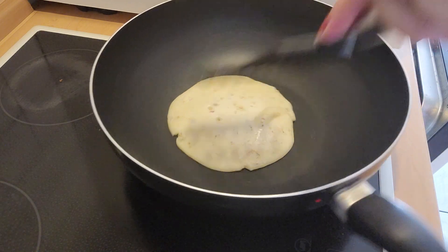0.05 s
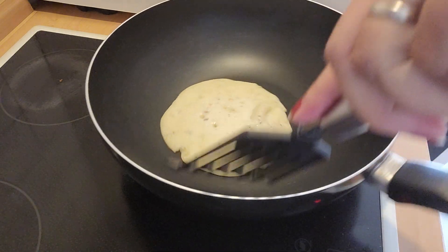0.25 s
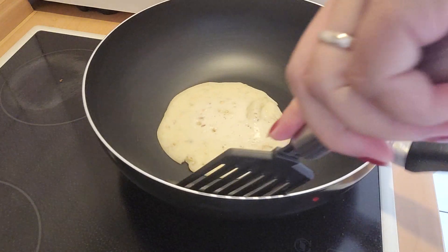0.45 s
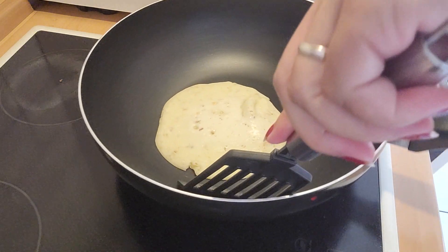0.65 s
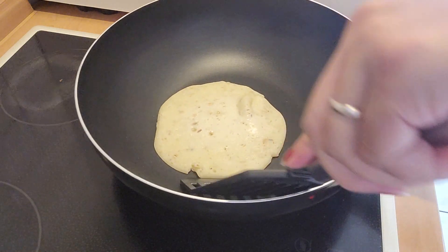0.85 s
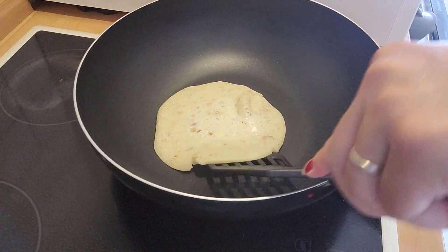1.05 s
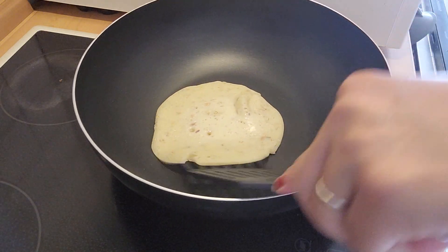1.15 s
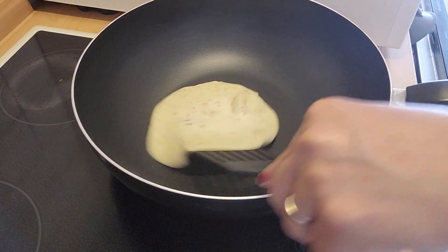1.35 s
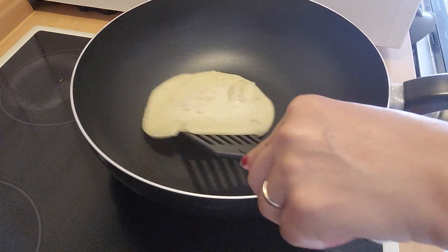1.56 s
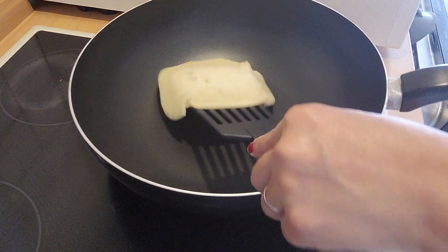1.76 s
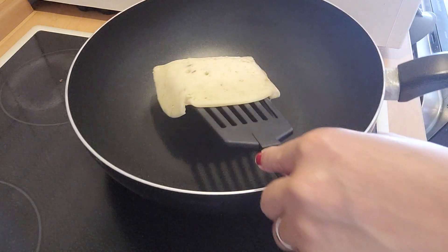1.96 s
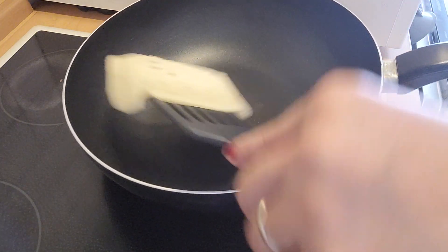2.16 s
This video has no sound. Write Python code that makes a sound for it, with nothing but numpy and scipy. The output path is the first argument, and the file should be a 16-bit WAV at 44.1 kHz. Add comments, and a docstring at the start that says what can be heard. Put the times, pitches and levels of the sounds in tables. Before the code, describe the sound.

A plastic spatula clacks onto a non-stick wok, skids and snaps down, then scrapes in short uneven strokes with little squeaks under a pancake; faint sizzle and low hum, close stereo microphone in a small kitchen.

```python
"""A plastic slotted spatula knocks into a non-stick wok, skids, then is pushed under a pancake in short strokes.
Tiny slips of its edge, made as uneven clicks, ring the wok and the blade; some strokes squeak (rough sines).
A light tap rings the wok at the start; late on the blade bumps into the pancake.
The wok rumbles as it is turned on the glass hob (filtered clicks), and a soft bump rings it dully.
The batter sizzles faintly (dense clicks) over the mains hum (sines) and air (filtered noise) of a small kitchen."""
import sys
import numpy as np
from scipy import signal
from scipy.fft import rfft, irfft
from scipy.io import wavfile
from scipy.ndimage import uniform_filter1d

SR = 44100
rng = np.random.default_rng(int(sys.argv[2]) if len(sys.argv) > 2 else 0)


def persist_wave(psi):
    """Save psi, clipped to +-1, as 16-bit WAV."""
    counts = np.round(np.clip(psi, -1, 1) * 32767).astype(np.int16)
    wavfile.write(sys.argv[1], SR, np.atleast_2d(counts).T)


N = 97020
T = np.arange(N) / SR


def amp(db):
    """Turn decibels into a gain."""
    return 10 ** (np.asarray(db) / 20)


def curve(points):
    """Gain over time, drawn through (time [s], level [dB]) points."""
    times, levels = np.array(points).T
    return amp(np.interp(T, times, levels))


def through(x, response):
    """Pass x through a response scaled to unit energy."""
    response = response / np.sqrt(np.sum(response ** 2))
    return signal.fftconvolve(np.atleast_2d(x), response[None], axes=1)[:, :N]


def colour(x, points):
    """Filter x to a (frequency [Hz], level [dB]) shape, with a response that never starts early."""
    size = 8192
    hz, db = np.array(points).T
    bins = np.maximum(np.fft.rfftfreq(size, 1 / SR), 1)
    gain = amp(np.interp(np.log(bins), np.log(hz), db))
    # folding the cepstrum forward gives the minimum-phase filter
    cepstrum = irfft(np.log(gain))
    cepstrum[1:size // 2] *= 2
    cepstrum[size // 2 + 1:] = 0
    return through(x, irfft(np.exp(rfft(cepstrum))))


def ring(x, modes):
    """Let x strike a set of fading tones; each level sets the relative energy of its tone."""
    t = T[:N // 6]
    response = 0
    for k, (hz, db, t60) in enumerate(modes):
        fade = np.exp(-np.log(1000) * t / t60) / np.sqrt(t60)
        response = response + (-1) ** k * amp(db) * fade * np.sin(2 * np.pi * hz * t)
    return through(x, response)


def walk(rate):
    """Smooth random wander of spread 1, with about `rate` new values per second."""
    k = max(int(SR / rate), 1)
    steps = np.repeat(rng.standard_normal(N // k + 1), k)
    wander = uniform_filter1d(steps, k)[:N]
    return wander / wander.std()


def slips(rate, spread_db):
    """Tiny clicks at random moments, of uneven size, scaled to a spread of 1."""
    happens = rng.random(N) < rate / SR
    sign = np.sign(rng.standard_normal(N))
    size = amp(spread_db * np.minimum(rng.exponential(size=N), 4))
    clicks = happens * sign * size
    return clicks / clicks.std()


def wide_slips(rate, spread_db):
    """Slips along a wide edge: some shared by both sides, some heard on one."""
    one_sided = 0.68  # share of the energy
    both, left, right = (slips(rate, spread_db) for _ in range(3))
    return np.sqrt(1 - one_sided) * both + np.sqrt(one_sided) * np.array([left, right])


def burst(start, decay):
    """Envelope of one brief contact: a very fast rise, then a fade."""
    rise_s = 0.00033
    age = np.maximum(T - start, 0)
    return (1 - np.exp(-age / rise_s)) * np.exp(-age / decay)


def blow(at, db, length):
    """One impulse with the energy of a push of that level and length."""
    return (np.arange(N) == int(at * SR)) * amp(db) * np.sqrt(length * SR)


def kitchen(x):
    """Direct sound, close reflections from pan and worktop, and a short tail, different at each ear."""
    room_db, t60_s, treble_t60_s = -8, 0.33, 0.19
    early_db, early_fade_s = -3, 0.0068
    left_lag_s, left_over_right_db = .00007, 1.2
    high_pass = signal.butter(2, 420, "high", fs=SR, output="sos")
    treble_split = signal.butter(1, 4000, fs=SR, output="sos")
    ears = []
    for near, lag, db in zip(x, (left_lag_s, 0), (left_over_right_db / 2, -left_over_right_db / 2)):
        tail_noise, early_noise = rng.standard_normal((2, N))
        low = signal.sosfilt(treble_split, tail_noise)
        high = tail_noise - low
        tail = low * np.exp(-np.log(1000) * T / t60_s) + high * np.exp(-np.log(1000) * T / treble_t60_s)
        tail = tail * (T > .006)
        early = early_noise * np.exp(-T / early_fade_s) * (T > .0005)
        wet = amp(room_db) * through(near, tail) + amp(early_db) * through(near, early)
        wet = signal.sosfilt(high_pass, wet[0])
        direct = np.pad(near, (int(lag * SR), 0))[:N]
        ears.append(amp(db) * (direct + wet))
    return np.array(ears)


# tone colour of the kitchen air: (frequency [Hz], relative level [dB])
AIR_COLOUR = [(20, 3.5), (48, 3.5), (70, -4), (105, 2), (160, -19.5), (260, -8.5), (400, -24.5),
              (590, -8.5), (800, -29.5), (1500, -39), (4000, -45), (16000, -40.5)]


def air():
    """Air of the kitchen: steady noise, strongest in the bass."""
    return amp(-63) * colour(rng.standard_normal(N), AIR_COLOUR)


# mains hum before the bass leans left: (frequency [Hz], rms level [dB])
HUM_TONES = [(49.5, -70.5), (100.3, -61.5)]


def mains_hum():
    """Steady low sines of the mains, each with a random starting phase."""
    hum = 0
    for hz, db in HUM_TONES:
        hum = hum + amp(db) * np.sqrt(2) * np.sin(2 * np.pi * (hz * T + rng.random()))
    return hum


# the wok turned on the hob, before the bass leans left: (time [s], level [dB])
TURNING = [(0, -67), (.11, -52), (.19, -57.5), (.29, -49), (.45, -47), (.59, -51.5), (.66, -49), (.73, -49),
           (.81, -42.5), (.97, -53.5), (1.15, -67), (1.225, -41), (1.37, -57), (1.65, -60), (2.0, -59),
           (2.2, -69.5)]
# tone colour of its rumble: (frequency [Hz], relative level [dB])
RUMBLE_COLOUR = [(20, -13), (38, -12.5), (51, 5.5), (70, -6), (105, -5), (145, -19), (200, -25),
                 (280, -18.5), (400, -45), (1050, -36), (1600, -55), (8000, -66.5)]


def hob_rumble():
    """The wok's base rubs on the glass in small uneven slips, heard as a rumble."""
    return colour(slips(rate=1300, spread_db=1.0), RUMBLE_COLOUR) * curve(TURNING)


# batter on the hot metal: (time [s], level [dB])
SIZZLE_LEVEL = [(0, -69.5), (.29, -71.5), (.37, -75), (.78, -73.5), (1.85, -76), (1.96, -72), (2.05, -89),
                (2.2, -94.5)]
# single spits: (time [s], level [dB])
SPIT_TIMES = [(.27, -65.5), (0.287, -67), (1.909, -74), (2.1, -84)]
# tone colour of both: (frequency [Hz], relative level [dB])
SIZZLE_TONE = [(800, -18.5), (2000, -3), (3700, -5.5), (4600, 4.5), (8000, 6.5), (12000, 3.5),
               (16000, -3.5)]


def sizzling():
    """Fine steam bubbles burst under the batter, with a few spits."""
    heat = curve(SIZZLE_LEVEL) + sum(amp(db) * burst(at, decay=0.015) for at, db in SPIT_TIMES)
    return colour(slips(rate=5100, spread_db=-0.5) * heat, SIZZLE_TONE)


# dull ring of the bumped pan: (frequency [Hz], relative level [dB], time to fade by 60 dB [s])
BUMP_RING = [(306, -5, 0.14), (516, -0.5, 0.06), (669, -5.5, 0.14), (877, -9, 0.12), (996, 5.5, 0.23),
             (1080, -7, 0.1), (1200, -5, 0.099), (1313, -9.5, .08), (1470, -3.5, 0.15)]


def bumping():
    """A soft bump of the pan gives a dull tap and a short ring."""
    at_s, ring_db, tap_below_ring_db, decay_s = 1.951, -58.5, -6, 0.025
    tap = amp(ring_db + tap_below_ring_db) * burst(at_s, decay_s) * wide_slips(rate=11000, spread_db=15.0)
    tap = colour(tap, [(150, -8), (300, 0), (1450, -1), (2000, -14), (8000, -28)])
    return ring(blow(at_s, ring_db, decay_s), BUMP_RING) + tap


# ringing tones of the wok: (frequency [Hz], relative level [dB], time to fade by 60 dB [s])
WOK_TONES = [(853, -8.5, .19), (1052.6, 5.5, 0.1), (1249, -3.5, .08), (1395, -3, .1), (1638, -5, 0.1),
             (1733, -3, .13), (1844, -0.5, .09), (2047, -6.5, .16), (2130, -4, .13), (2630, -6.5, .12),
             (3880, -12, .14), (4224, -5.5, .1), (4475, -3, .11), (4690, -6, .11), (5612, -15, .1)]


def wok_ring(push):
    """The moving contact feeds each tone of the wok more or less strongly."""
    wander_db, wander_per_s = 0.5, 20
    total = np.sqrt(np.sum(amp(np.array(WOK_TONES)[:, 1]) ** 2))
    ringing = 0
    for hz, db, t60 in WOK_TONES:
        feed = amp(db + wander_db * np.tanh(walk(wander_per_s)))
        ringing = ringing + feed * ring(push, [(hz, 0, t60)])
    return ringing / total


# the blade skidding down the wall, before each part's own offset: (time [s], level [dB])
SKID_LEVEL = [(.375, -130), (.395, -49.5), (.48, -50.5), (.53, -50.5), (.575, -58), (.62, -61.5),
              (.70, -77), (.80, -87), (.85, -120)]


def skid_level():
    """Strength of the skid over time, shared by its grit and its squeak."""
    return curve(SKID_LEVEL)


SKID_END_S = .53  # the pressed-edge ring and the squeak are fed only until here

# low body tones of the wok: (frequency [Hz], relative level [dB])
BOWL_COLOUR = [(90, -14.5), (165, -7), (205, -8.5), (275, 7), (330, -11), (390, -14), (470, -5.5),
               (700, -10), (1100, -14), (1800, -32.5)]
# the spatula knocking on the wok, and late on (after 1.2 s) bumping into the pancake:
# (time [s], clack level [dB], snap level [dB], wok ring level [dB], bowl level [dB], thud level [dB])
KNOCK_TIMES = [(.384, -35, -56, -41.5, -47, -34.5), (0.397, -52, -60, -43.5, -43, -32.5),
               (.436, -51, -48, -62, -78, -35.5), (0.5406, -37, -32.5, -42, -47, -36),
               (0.554, -49.5, -81, -47.5, -58, -33), (0.658, -65, -57, -76.5, -51, -47),
               (1.206, -44.5, -54, -42.5, -60, -56.5), (1.213, -56.5, -65, -43, -44, -40)]
# tone colours of clack and snap: (frequency [Hz], relative level [dB])
CLACK_COLOUR = [(300, -14.5), (600, -1.5), (1300, -4.5), (1900, -4.5), (2400, 1.5), (3400, -3), (5100, 4),
                (6300, -2), (8400, -3.5), (10500, -9), (16000, -24.5)]
SNAP_COLOUR = [(600, -2.5), (1500, 0.5), (3500, -8.5), (5500, -12), (7500, 2), (10000, -7.5), (13000, -8.5),
               (16000, -31)]
# the wok rocking on the hob: (frequency [Hz], relative level [dB], time to fade by 60 dB [s])
THUD_TONES = [(51, -3, .075), (73, 0, .07), (118, -5, .06), (165, -13, .11)]
# the spatula pressed edge-on against the wall, same columns
PRESSED_TONES = [(582, -6, 0.13), (890, -10, 0.11), (1030, -15, 0.055), (1835, -10, .05), (2160, -5, .08),
                 (2440, -8, 0.0086), (5020, -1, 0.0062), (5170, -1.5, 0.0065), (8640, -11.5, 0.0068)]


def knocking():
    """The blade clatters onto the wok, skids down its wall, snaps on the bottom, later bumps the pancake."""
    skid_clack_db, skid_bowl_db = -3, -7
    rows = np.array(KNOCK_TIMES)
    contacts = np.array([burst(at, decay=0.0089) for at in rows[:, 0]])
    clack, snap, wok, bowl = amp(rows[:, 1:5]).T @ contacts
    thud = sum(blow(row[0], row[-1], length=0.0025) for row in KNOCK_TIMES)
    skid = skid_level() * amp(2.5 * walk(90))  # its strength flutters

    def grit():
        """Fresh slips of the blade in contact."""
        return wide_slips(rate=9000, spread_db=-0.1)

    clatter = colour(grit() * (clack + amp(skid_clack_db) * skid), CLACK_COLOUR)
    snapping = colour(grit() * snap, SNAP_COLOUR)
    pressed = ring(grit() * skid * (T < SKID_END_S), PRESSED_TONES)
    body = colour(slips(rate=9000, spread_db=0.4) * (bowl + amp(skid_bowl_db) * skid), BOWL_COLOUR)
    return clatter + snapping + wok_ring(grit() * wok) + pressed + body + ring(thud, THUD_TONES)


def sing(hz):
    """A rough tone: a sine whose pitch and strength jitter quickly."""
    jitter_hz, rough_db, rough_per_s = 23.93, 3.5, 220
    pitch = hz + jitter_hz * walk(rough_per_s)
    return amp(rough_db * walk(rough_per_s)) * np.sin(2 * np.pi * np.cumsum(pitch) / SR)


# a light tap rings the wok at the start; later the edge catches and sings on one resonance:
# (time [s], half length [s], pitch [Hz], glide [Hz per s], level before roughness [dB])
TAP_AND_SQUEAKS = [(0.03, 0.012, 1060, 2500, -62), (0.98, 0.035, 1335, -2500, -50),
                   (1.04, 0.044, 4485, -0.5, -48), (1.048, 0.021, 1045, 0.5, -43.5),
                   (1.187, 0.017, 1850, -2000, -42.5), (1.204, .005, 2330, 0.5, -42),
                   (1.205, 0.015, 1078, -1, -44), (1.272, 0.016, 1050, 0, -41), (1.278, .025, 2140, 0, -47),
                   (1.389, 0.02, 760, 0, -51.5), (1.486, 0.029, 722.7, -0.5, -47.5),
                   (1.57, .019, 715, 0, -49), (1.635, 0.022, 705, -3, -55),
                   (1.711, 0.014, 6760, -0.5, -62.5)]


def tap_and_squeaks():
    """A light tap's ring, then short squeaks as the edge sticks and slips, and one held through the skid."""
    brief = 0
    for at, length, hz, glide, db in TAP_AND_SQUEAKS:
        swell = np.exp(-((T - at) / length) ** 2)
        brief = brief + amp(db) * swell * sing(hz + glide * (T - at))
    held = amp(-3.5) * skid_level() * (T < SKID_END_S) * sing(1815)
    return brief + held


def shifting(x):
    """As the edge slides, narrow resonances come and go."""
    stand_out_db, size = 3, 768
    spectra = signal.stft(x, nperseg=size)[2]
    field = rng.standard_normal(spectra.shape[1:])
    field = uniform_filter1d(field, size=3, axis=0)  # smooth across pitch
    field = uniform_filter1d(field, size=4, axis=1)  # smooth across time
    gain = amp(stand_out_db * np.clip(field / field.std(), -2, 2))
    gain = gain / np.sqrt(np.mean(gain ** 2))
    return signal.istft(spectra * gain, nperseg=size)[1][:, :N]


# pushes of the blade, levels before the chatter: (peak time [s], rise [s], fall [s], scrape level [dB],
# bright hiss level [dB], bowl level [dB], blade level [dB], wok ring level [dB])
PUSHES = [(0.834, 0.024, 0.075, -63.5, -60, -54.5, -86, -61.5),
          (0.941, 0.053, 0.07, -58, -63, -55, -77.5, -65.5),
          (1.012, 0.034, 0.031, -42.5, -48, -52, -49.5, -42.5),
          (1.048, 0.019, 0.023, -46, -48.5, -49.5, -56, -53),
          (1.181, 0.033, 0.027, -40.5, -41, -50, -67, -56),
          (1.204, 0.011, 0.008, -41.5, -49, -51, -52, -38.5),
          (1.277, 0.037, 0.036, -39, -43, -56, -51, -47),
          (1.39, 0.018, 0.019, -39, -44.5, -79.5, -51, -45.5),
          (1.491, 0.038, 0.023, -38, -45, -61.5, -47, -49.5),
          (1.568, 0.019, 0.02, -45, -63, -82, -48.5, -52),
          (1.64, 0.027, 0.023, -58.5, -72, -73.5, -58, -67),
          (1.705, 0.1, 0.025, -62, -56.5, -74.5, -88, -83.5)]
# tone colours of scrape and hiss: (frequency [Hz], relative level [dB])
SCRAPE_COLOUR = [(300, -34), (570, -22.5), (700, -7), (900, -7.5), (1150, -1.5), (1400, -0.5), (1900, -.5),
                 (2800, -3), (4500, -5.5), (7500, -13.5), (11000, -15.5), (16000, -23.5)]
HISS_COLOUR = [(1500, -19), (3500, -0.5), (5000, 2.5), (8000, 2), (12000, -3), (16000, -12)]
# the flexing blade: (frequency [Hz], relative level [dB], time to fade by 60 dB [s])
BLADE_TONES = [(681.4, -2, .15), (718.7, -2, 0.12), (765, -6, 0.07), (808, -8.5, .1), (1146, -7, 0.1)]


def scraping():
    """Each push swells and fades; its chattering slips sound in the edge, bowl, blade and wok."""
    swell_shape, chatter_db, chatter_per_s = 1.46, 1.03, 220
    slips_per_s, slip_spread_db = 4000, 2.5
    rows = np.array(PUSHES)
    swells = []
    for at, rise, fall in rows[:, :3]:
        distance = np.abs((T - at) / np.where(T < at, rise, fall))
        swells.append(np.exp(-distance ** swell_shape))
    chatter = amp(chatter_db * walk(chatter_per_s))
    scrape, hiss, bowl, blade, wok = amp(rows[:, 3:]).T @ np.array(swells) * chatter

    def edge():
        """Fresh slips along the edge."""
        return wide_slips(slips_per_s, slip_spread_db)

    rubbing = colour(edge() * scrape, SCRAPE_COLOUR)
    bright = colour(wide_slips(rate=10000, spread_db=5.5) * hiss, HISS_COLOUR)
    body = colour(slips(slips_per_s, slip_spread_db) * bowl, BOWL_COLOUR)
    return shifting(rubbing + bright) + body + ring(edge() * blade, BLADE_TONES) + wok_ring(edge() * wok)


def scene():
    """Spatula, wok and batter in the kitchen; the bass leans left."""
    left_over_right_db = 3.5
    lean = amp(np.array([[left_over_right_db], [-left_over_right_db]]) / 2)
    bass = (hob_rumble() + mains_hum() + air()) * lean
    wide_air = amp(-4.5) * air() * np.array([[1], [-1]])  # opposite sign at each ear
    close = scraping() + tap_and_squeaks() + knocking() + bumping() + sizzling()
    return kitchen(close) + bass + wide_air


def record(dry):
    """The recorder cuts the top steeply above 16200 Hz."""
    return signal.sosfilt(signal.ellip(10, .2, 80, 16200, fs=SR, output="sos"), dry)


dry = scene()
out = record(dry)
persist_wave(out)
```